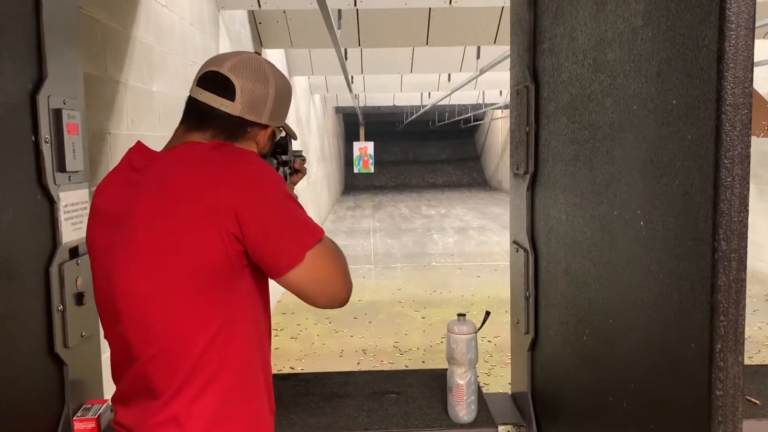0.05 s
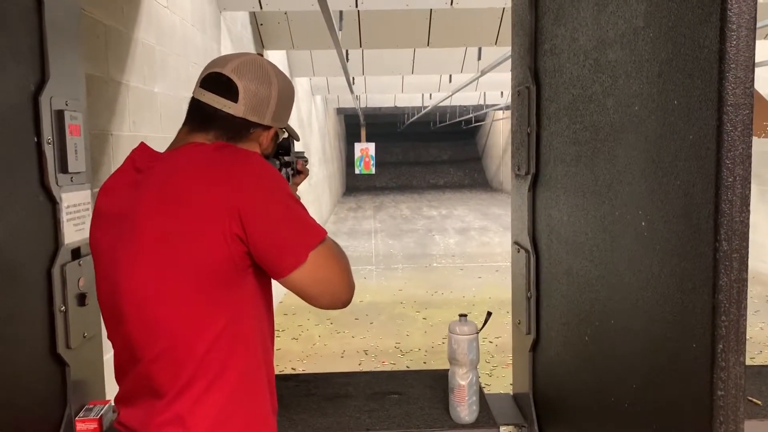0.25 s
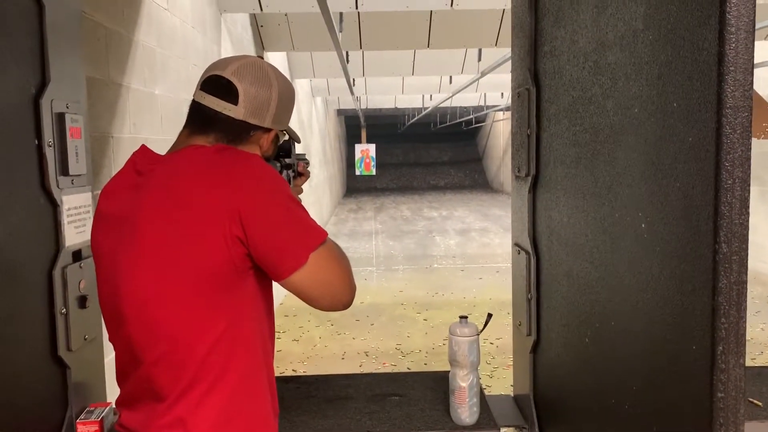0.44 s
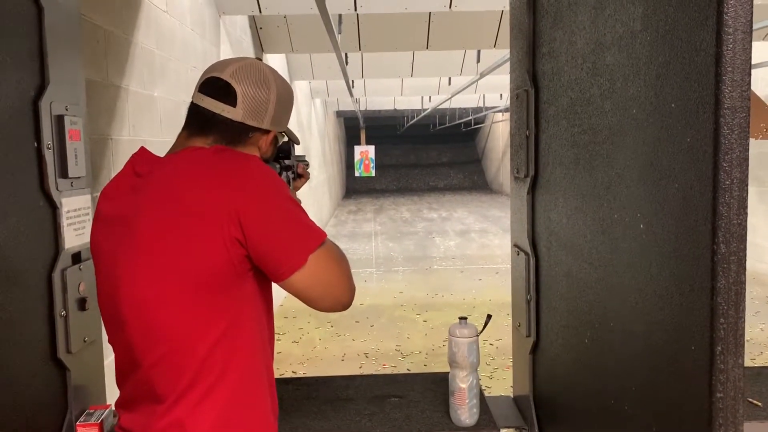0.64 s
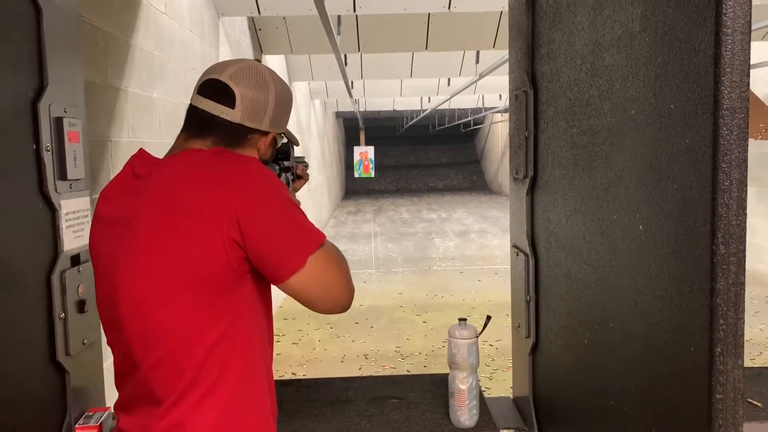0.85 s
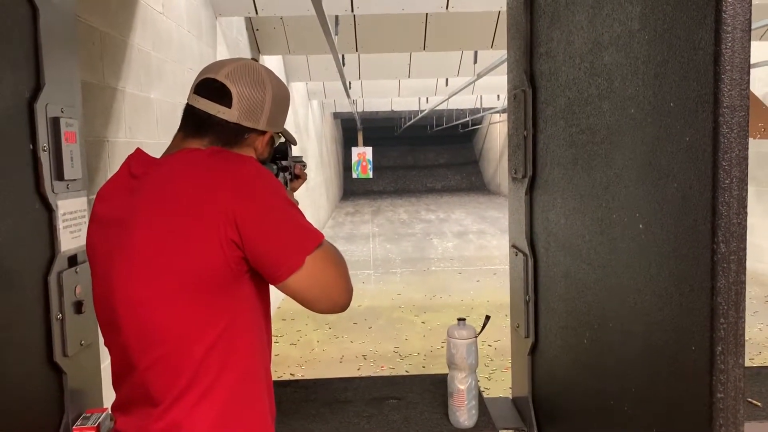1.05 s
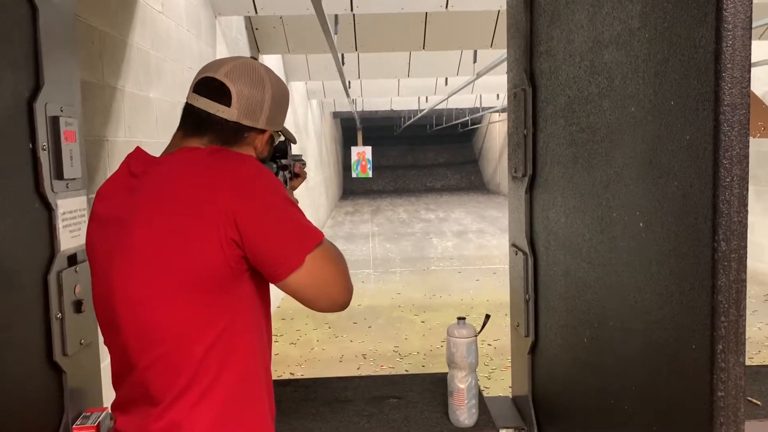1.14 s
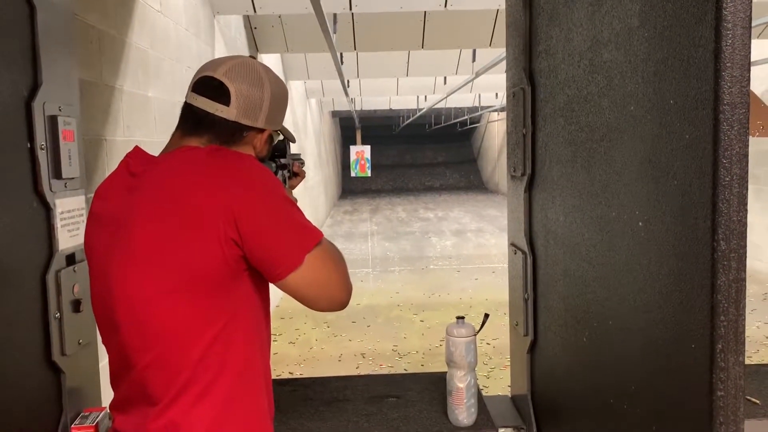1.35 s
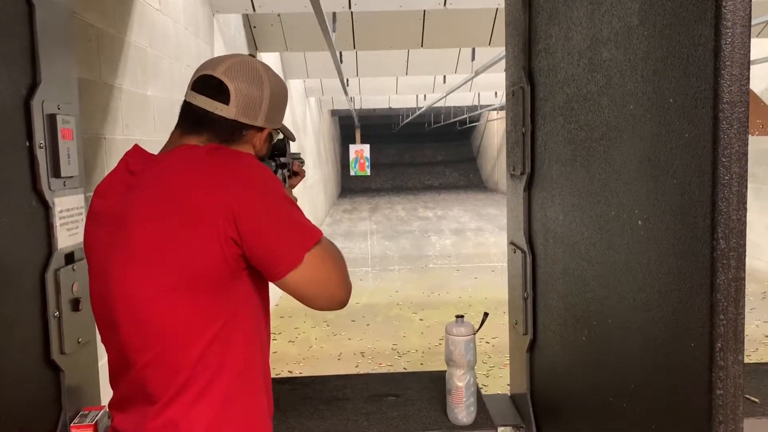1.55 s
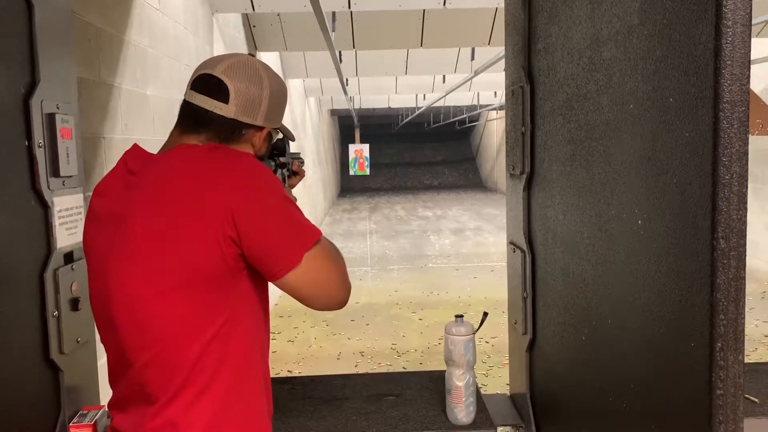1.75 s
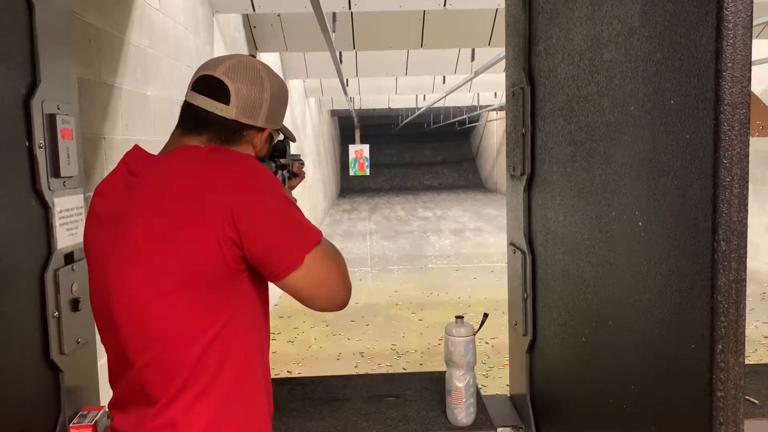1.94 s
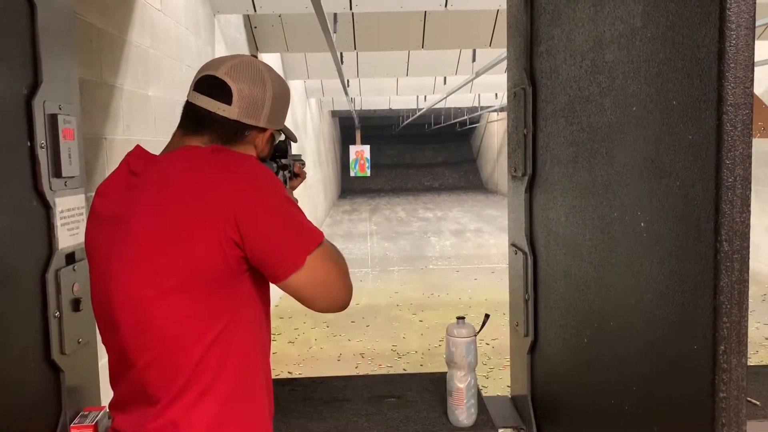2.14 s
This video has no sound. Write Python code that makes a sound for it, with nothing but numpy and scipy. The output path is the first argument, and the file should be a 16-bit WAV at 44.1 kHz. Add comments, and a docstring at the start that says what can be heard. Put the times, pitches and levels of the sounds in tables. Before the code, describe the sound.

A rifle fires twice in a hard-walled shooting hall, each dull thud and crack followed by a dense ringing roar, with faint brass cases clinking over throbbing fan rumble; the microphone, behind the booth, overloads slightly.

```python
"""Rifle shots in a concrete range

Two shots in a long hall, heard from behind the booth: ringing thuds, cracks of noise and low returns.
Each roar is noise in bands that holds for a moment, swelling in the bass, and then dies away.
Spent brass cases ring as wavering sine tones with a noisy rattle.
Under them lies the ventilation: steady noise with a throbbing rumble."""
import sys
import numpy as np
from scipy import signal
from scipy.fft import rfft, irfft
from scipy.io import wavfile
from scipy.ndimage import uniform_filter1d

SR = 44100
rng = np.random.default_rng(int(sys.argv[2]) if len(sys.argv) > 2 else 0)


def int16_out(signal):
    """Quantize to a 16-bit WAV file."""
    q = np.round(np.clip(np.atleast_2d(signal).T, -1, 1) * 32767)
    wavfile.write(sys.argv[1], SR, q.astype(np.int16))


N = 97020  # 2.2 s
T = np.arange(N) / SR
HZ = np.fft.rfftfreq(N, 1 / SR)


def amp(db):
    """Turns dB into a plain factor."""
    return 10 ** (np.asarray(db) / 20)


def evened(x):
    """Scales a signal to an RMS of one."""
    return x / np.sqrt(np.mean(x ** 2) + 1e-20)


def read(points):
    """Draws a curve over all frequencies through (Hz, value) points, on a log frequency axis."""
    f, value = np.transpose(points)
    return np.interp(np.log(HZ + 1), np.log(f + 1), value)


def late(x, s):
    """Delays a sound by s seconds."""
    return np.pad(x, ((0, 0), (round(max(s, 0) * SR), 0)))[:, :N]


def smooth(x, size):
    """Smooths twice with a running mean."""
    return uniform_filter1d(uniform_filter1d(x, size), size)


def peak_db(hz, width, db):
    """A resonance: a boost in dB that falls off to both sides of its centre."""
    return db / (1 + (2 * (HZ - hz) / width) ** 2)


# How alike left and right are. Each row: frequency in Hz, likeness from -1 (opposite) to 1 (same).
LIKENESS = [(60, 1), (95, 0.76), (150, 1), (240, 0.55), (380, -0.081), (600, 0.059), (950, -0.48),
            (1500, -0.32), (2380, -0.068), (3770, 0.22), (5980, 0.062), (9470, -0.35), (11500, -0.56),
            (15000, 0.14)]
# Which side is louder. Each row: frequency in Hz, left minus right in dB.
LEAN = [(60, 0.5), (92, 0), (140, -3.5), (210, 2.5), (330, 2.5), (500, 4), (770, 6.5), (1170, 2),
        (1790, 2.5), (2740, 0), (4190, 1.5), (6410, 1.5), (9810, -7.5), (15000, 4.5)]


def pair():
    """Spectra of left and right noise with the likeness and lean of the two microphones."""
    a, b = rfft(rng.standard_normal((2, N)))
    same = np.clip(read(LIKENESS), -1, 1)
    right = same * a + np.sqrt(1 - same ** 2) * b
    return np.array([a, right]) * amp(np.outer([.5, -.5], read(LEAN)))


# Colour of the ventilation noise. Each row: frequency in Hz, relative level in dB per Hz.
AIR = [(12, -25.5), (25, -8), (45, -2), (70, -1), (100, -5.5), (150, -16), (300, -17.5), (560, -23),
       (850, -28.5), (1640, -32), (5300, -43), (8400, -44), (10400, -44.5), (13000, -46), (15500, -64)]
AIR_DB = -45.5
RUMBLE_HZ, RUMBLE_RISE_DB_PER_S = 140, 0.5
THROB_DEPTH, THROBS_PER_S, THROB_PEAK_S = .4, 13, 1.745
FADING_DB, FADING_T60 = 3, 1.4  # remains of an earlier shot, over the ventilation; 60 dB decay in s


def ventilation():
    """Hiss over a throbbing rumble, raised at first by a fading earlier shot."""
    z = pair() * amp(read(AIR))
    low = 1 / (1 + (HZ / RUMBLE_HZ) ** 4)
    since_peak = T - THROB_PEAK_S
    throb = 1 + THROB_DEPTH * np.cos(2 * np.pi * THROBS_PER_S * since_peak)
    rumble = irfft(z * low, N) * throb * amp(RUMBLE_RISE_DB_PER_S * since_peak)
    hiss = irfft(z * (1 - low), N)
    earlier_shot = amp(FADING_DB - 60 * T / FADING_T60)
    return amp(AIR_DB) * evened(rumble + hiss) * (1 + earlier_shot)


# Bounces of the cases. Each row: start in seconds, level in dB, then upper tone and rattle in dB
# relative to that level.
CASES = [(0.0, -78, 19, -5), (0.098, -56.5, 4, 14.5), (0.742, -52, -28.5, 2), (1.0, -64, -19, 13),
         (1.385, -62.5, -24.5, -8), (1.535, -58, -24.5, 6), (1.62, -59, -22.5, 4), (1.76, -66.5, -28, 1),
         (2.09, -60, -17, 2.5)]
# Brass tones, lower then upper. Each row: frequency in Hz, time to decay by 60 dB in seconds.
BRASS = [(10680, 0.29), (12280, .6)]
RATTLE_HZ, RATTLE_T60 = (4130, 5900), 0.71  # band edges, 60 dB decay in s
WAVER = 1  # RMS of the level wobble, as a share of the tone


def cases():
    """Each bounce rings two decaying, wavering brass tones and a rattle of band-limited noise."""
    out = np.zeros((2, N))
    b, a = signal.butter(2, RATTLE_HZ, "band", fs=SR)
    for s, db, upper_db, rattle_db in CASES:
        noise = rng.standard_normal((4, N))
        waver = 1 + WAVER * evened(uniform_filter1d(noise[:2], 150))
        ring = np.zeros(N)
        for (hz, t60), tone_db in zip(BRASS, (0, upper_db)):
            ring += amp(tone_db - 60 * T / t60) * np.sin(2 * np.pi * hz * T)
        rattle = amp(rattle_db - 60 * T / RATTLE_T60) * signal.lfilter(b, a, noise[2:])
        onset = np.minimum(T / 0.0072, 1)
        out += amp(db) * late((ring * waver + rattle) * onset, s)
    return out


# Colour shared by the swell, the cracks and the roar.
# Each row: frequency in Hz, relative level in dB per Hz.
ROAR = [(15, -51.5), (25, -27), (48, -26), (80, -4), (120, -14), (285, -5), (367, -1), (450, -4.5),
        (675, -8), (747, -16), (870, -12), (1720, -19), (2590, -21.5), (7500, -29), (8300, -22),
        (10700, -31), (12500, -29), (15500, -42.5)]
LEAD_S, LEAD_DB, LEAD_DB_PER_S = 0.018, -16, 1505.5  # length, level at its end, growth
LEAD_HZ = 6710  # the treble falls away above this
LEAD_BASS_DB = (-3, -9)  # left and right, below 1200 Hz


def lead():
    """A faint noise swell that grows until the blast arrives, boomier on the left."""
    tilt = amp(np.outer(LEAD_BASS_DB, HZ < 1200)) * (HZ > 250)
    treble_cut = 1 / (1 + (HZ / LEAD_HZ) ** 8)
    noise = evened(irfft(pair() * amp(read(ROAR)) * treble_cut * tilt, N))
    growth = amp(LEAD_DB + LEAD_DB_PER_S * np.minimum(T - LEAD_S, 0))
    return noise * growth * (T < LEAD_S) * np.minimum(T / 0.0016, 1)


# First arrivals. Each row: delay in seconds, thud level left and right in dB, thud frequency in Hz,
# thud 60 dB decay in seconds, crack level in dB, crack 60 dB decay in seconds.
EARLY = [(0.0013, -4.5, -20, 962, 0.03, -10.5, 0.011), (.002, -6.5, -25, 390, 0.07, -21.5, 0.14),
         (0.0108, -20, -21, 700, .012, -16, .03), (0.0157, -15.5, -12.5, 600, 0.012, -12.5, 0.016)]
# A resonance in the cracks. The row: frequency in Hz, width in Hz, boost in dB.
CRACK_RING = (8500, 1100, 6.5)
# Low returns from the ends of the hall.
# Each row: delay of the middle in seconds, frequency in Hz, length in seconds, level in dB.
RETURNS = [(0.07, 60.3, 0.013, -28.5), (0.164, 80, 0.061, -17.5), (0.235, 36.7, 0.062, -23),
           (0.316, 75.1, 0.11, -30), (.38, 44, 0.058, -33), (0.536, 40, 0.23, -40.5),
           (0.063, 380, 0.012, -21), (0.159, 367, 0.078, -15), (0.154, 447, 0.012, -18.5),
           (0.337, 302, 0.15, -37.5), (.645, 380, 0.036, -46.5)]


def blast():
    """The booth passes a dull thud and a short crack, the first walls answer, low returns follow."""
    out, t = np.zeros((2, N)), T[:SR // 10]
    sharp = amp(read(ROAR) + peak_db(*CRACK_RING)) * (HZ > 1500)
    for delay, left_db, right_db, hz, t60, crack_db, crack_t60 in EARLY:
        thud = np.sin(2 * np.pi * hz * t) * amp(-60 * t / t60)
        noise = evened(irfft(pair() * sharp, N))[:, :len(t)]
        crack = noise * amp(crack_db - 60 * t / crack_t60)
        at = round(max(delay, 0) * SR)
        out[:, at:at + len(t)] += thud * amp([[left_db], [right_db]]) + crack
    for s, hz, length, db in RETURNS:
        hump = np.exp(-(2 * (T - s) / length) ** 2)
        out += amp(db) * hump * np.sin(2 * np.pi * hz * (T - s))
    return out


PATCHY_DB, PATCHY_LOW_HZ = 2.8, 900  # unevenness, weaker below this frequency


def patchy(x):
    """Uneven reflections: patches about 300 Hz by 25 ms are louder or softer, less so in the bass."""
    hz, _, z = signal.stft(x, SR, nperseg=512, noverlap=384)
    patches = uniform_filter1d(rng.standard_normal(z.shape), size=4, axis=1)
    patches = uniform_filter1d(patches, size=9, axis=2)
    strength = np.minimum(hz / PATCHY_LOW_HZ, 1)[:, None] ** 2
    z = z * amp(PATCHY_DB * evened(patches) * strength)
    return signal.istft(z, nperseg=512, noverlap=384)[1][:, :N]


# Resonances of the hall. Each row: frequency in Hz, width in Hz, boost in dB.
HALL_MODES = [(248, 16, 4.5), (343, 10.1, 5.5), (380, 40, 3), (502, 14, 4.5), (670, 9.2, 2), (698, 12.3, 1),
              (824, 37, 3.5), (883, 10, 8)]
# How each band lives and dies. Each row: centre in Hz, hold in seconds, start level relative to the
# end of the hold in dB, 60 dB decay after it in seconds, level of the late tail in dB.
HALL = [(40, 0.59, -7.5, 0.72, -20), (91, 0.17, -8.5, 0.8, -19.5), (191, 0.23, -9, 1, -23),
        (380, 0.18, -4.5, 0.83, -19), (900, 0.19, 1.5, 0.44, -8), (2550, 0.18, 0.5, 0.54, -22.5),
        (6200, 0.21, 7.5, 0.51, -27.5), (13400, .17, 5.5, 0.38, -43.5)]
# Clusters of reflections in the treble of the roar. Each row: delay in seconds, boost in dB.
SLAPS = [(.032, 4.5), (.044, 4), (.062, 4.5), (.074, 1), (.125, 2.5), (.19, 1.5)]
SLAP_S, SLAP_LOW_HZ = 0.0057, 1200  # half width in time; only bands centred above this
RISE_S, LATE_T60 = 0.0037, 1.26  # onset, 60 dB decay of the late tail in s
STEP_DB, STEP_S = -2.5, 0.019  # the roar drops a step as the hold ends
LUMPY_DB, LUMP_S = .8, .012  # random level wobble of each band, and its smoothing time


def hall():
    """Diffuse answer of the hall: each band drifts through a hold, then dies; a late tail lingers."""
    colour_db = read(ROAR) + sum(peak_db(*mode) for mode in HALL_MODES)
    z, out = pair() * amp(colour_db), np.zeros((2, N))
    z /= np.sqrt(np.mean(irfft(z, N) ** 2))
    for k, (hz, hold, start_db, t60, tail_db) in enumerate(HALL):
        # this band's share fades into its neighbours
        share = read([(row[0], float(j == k)) for j, row in enumerate(HALL)])
        drift_db = start_db * np.maximum(1 - T / hold, 0)
        decay_db = -60 * np.maximum(T - hold, 0) / t60
        step_db = STEP_DB * np.clip((T - hold) / STEP_S, 0, 1)
        shape = amp(drift_db + decay_db + step_db) + amp(tail_db - 60 * T / LATE_T60)
        lumps = evened(smooth(rng.standard_normal(N), round(LUMP_S * SR)))
        if hz > SLAP_LOW_HZ:
            shape = shape * amp(sum(db * np.exp(-((T - s) / SLAP_S) ** 2) for s, db in SLAPS))
        out += irfft(z * share, N) * shape * amp(LUMPY_DB * lumps)
    return patchy(out) * np.minimum(T / RISE_S, 1)


# The shots. Each row: start in seconds, level in dB.
SHOTS = [(0.2232, 3), (1.0253, 1.73)]
# How alike the roars are. Each row: frequency in Hz, share of the roar common to all shots (0 to 1).
ALIKE = [(500, .93), (2000, .6), (5000, .33)]
ROAR_DB, FILL_S = -12.5, .0105  # roar level within a shot, and its delay in s


def shots():
    """One hall for all shots: the bass of the roar repeats closely, the treble differs."""
    alike, shared = read(ALIKE), rfft(hall())
    out = np.zeros((2, N))
    for s, db in SHOTS:
        own = rfft(hall())
        roar = irfft(alike * shared + np.sqrt(1 - alike ** 2) * own, N)
        # the swell ends where the first arrival begins
        swell = late(lead(), s + EARLY[0][0] - LEAD_S)
        out += amp(db) * (swell + late(blast(), s) + amp(ROAR_DB) * late(roar, s + FILL_S))
    return out


def scene():
    """Ventilation, cases and shots together."""
    return ventilation() + cases() + shots()


# Colour of the top octave. Each row: frequency in Hz, level in dB.
TOP = [(10900, -2), (11150, -24.5), (11800, -12), (12150, -3), (13600, 0), (14800, -2.5), (15300, -7)]
CEILING, EDGE_HZ = 1.05, 15400  # soft limit of the waveform, upper edge of the sound


def record(dry):
    """Colour of the top octave, soft ceiling, band limit."""
    x = irfft(rfft(dry) * amp(read(TOP)), N)
    x = x / (1 + (x / CEILING) ** 4) ** .25
    lowpass = signal.firwin(511, EDGE_HZ, window=("kaiser", 9), fs=SR)
    return signal.oaconvolve(x, lowpass[None], "same")


dry = scene()
out = record(dry)
int16_out(out)
```